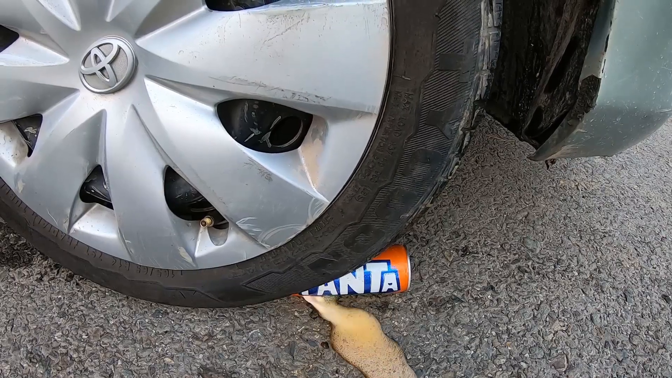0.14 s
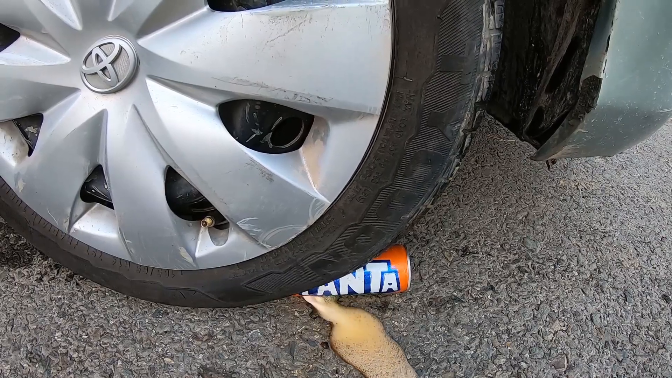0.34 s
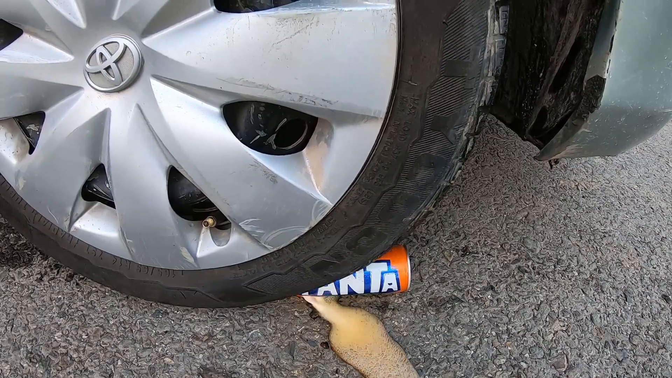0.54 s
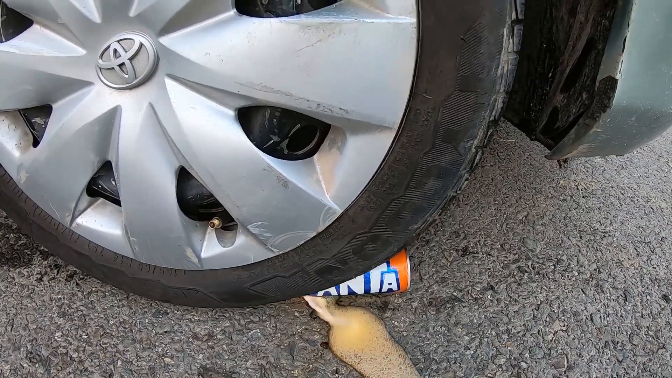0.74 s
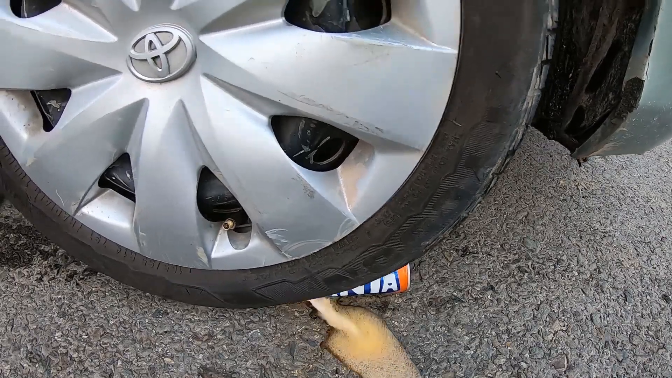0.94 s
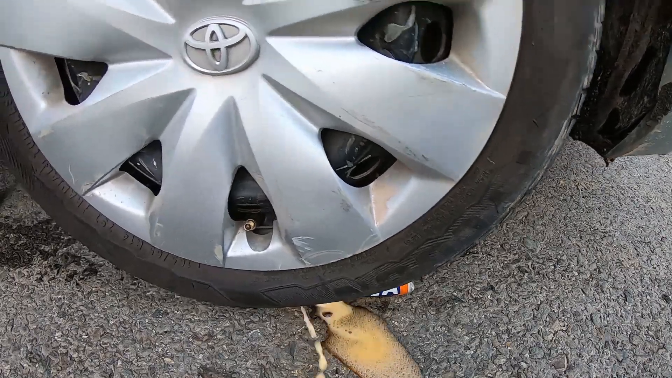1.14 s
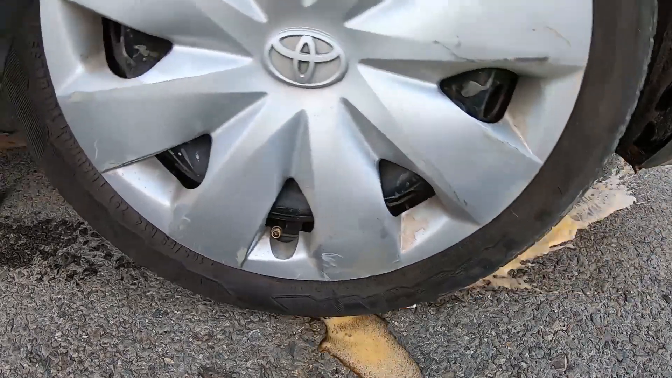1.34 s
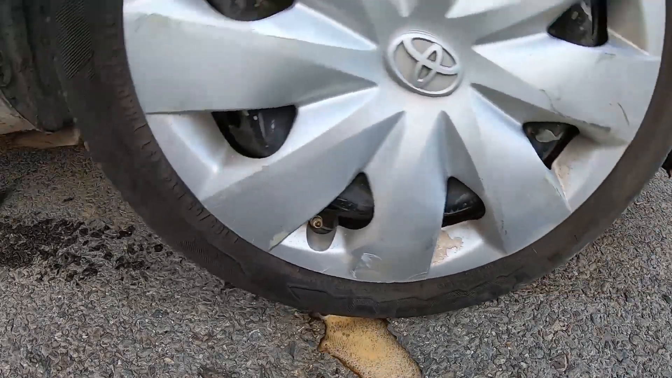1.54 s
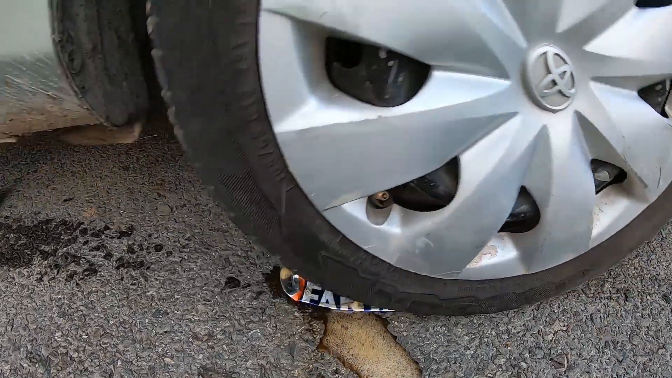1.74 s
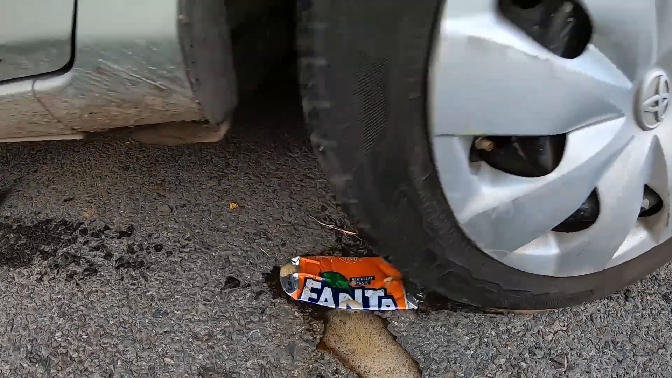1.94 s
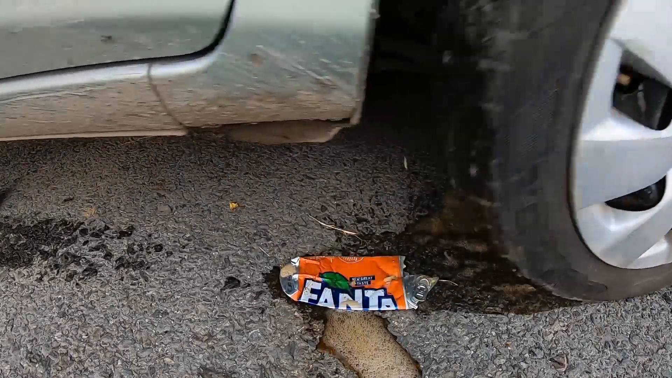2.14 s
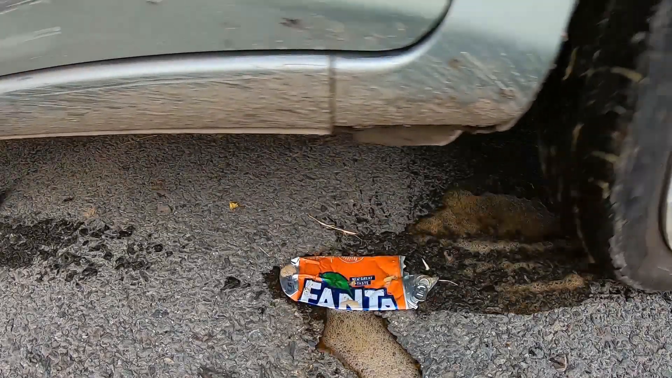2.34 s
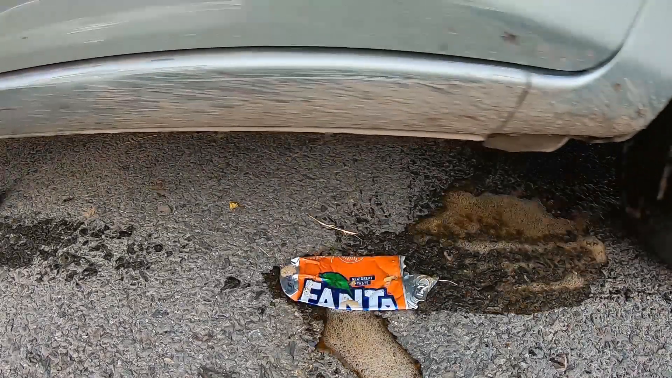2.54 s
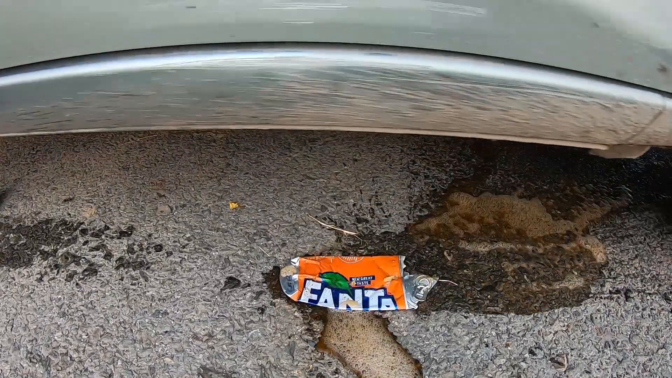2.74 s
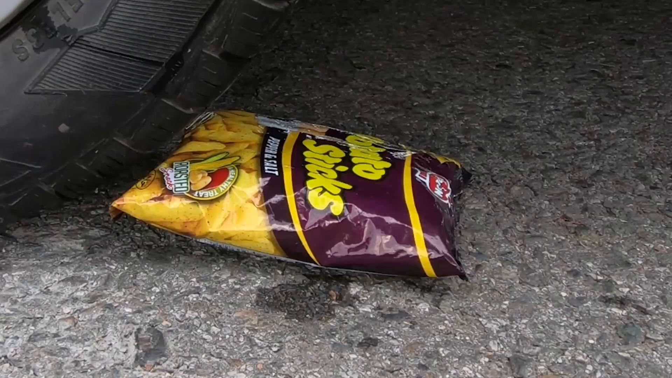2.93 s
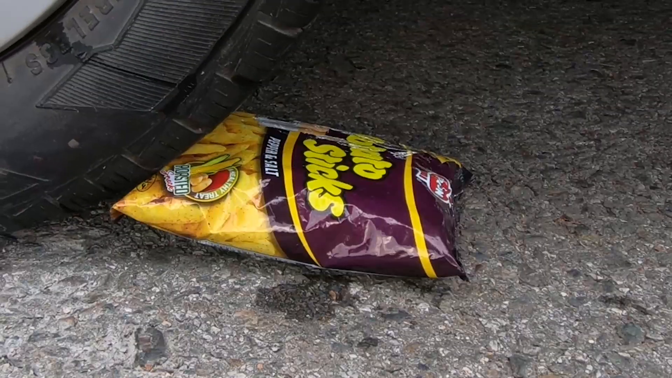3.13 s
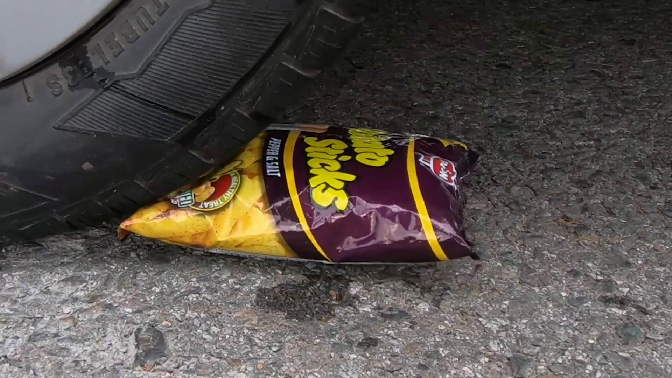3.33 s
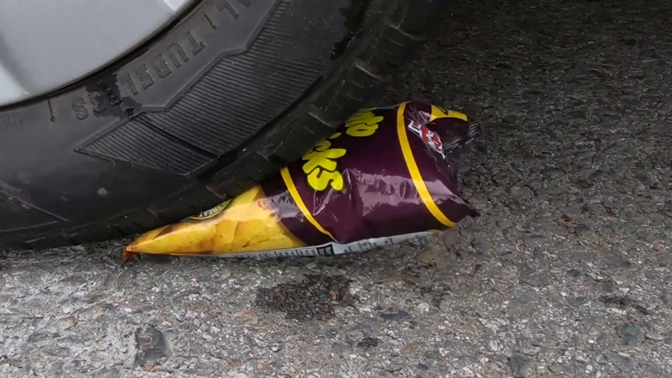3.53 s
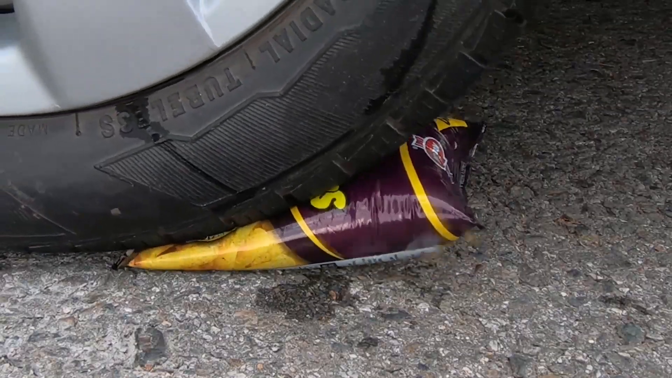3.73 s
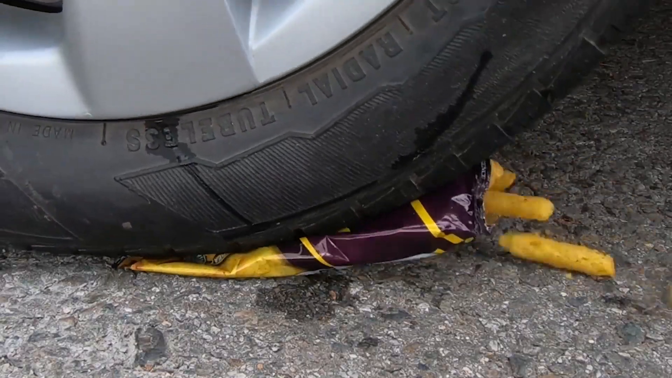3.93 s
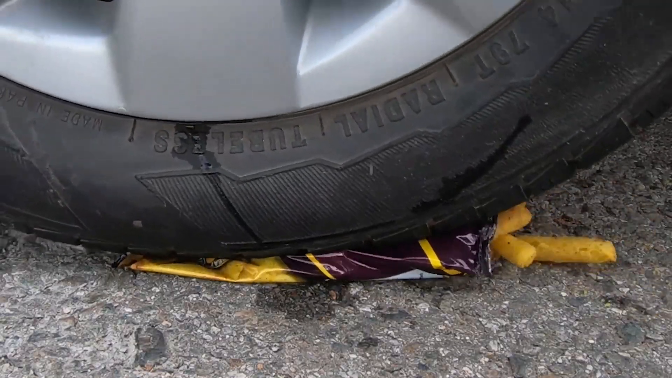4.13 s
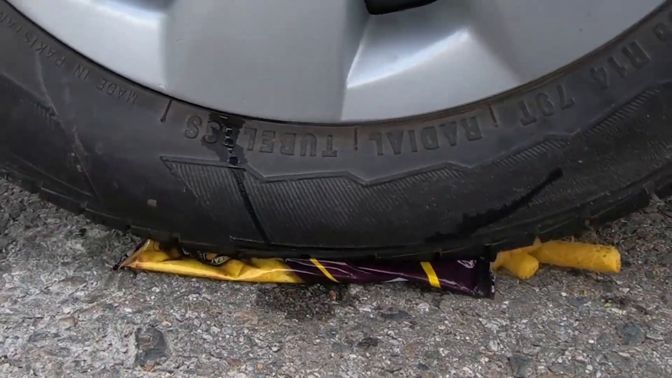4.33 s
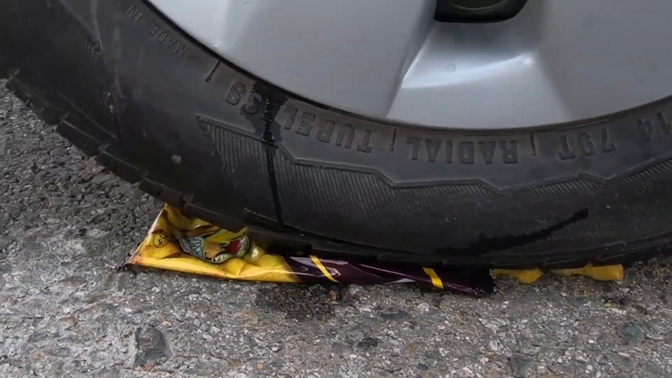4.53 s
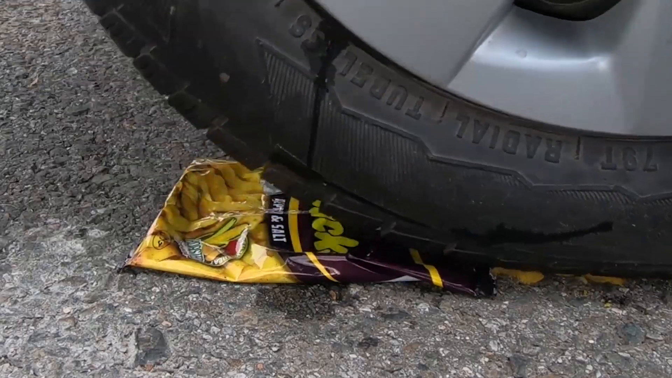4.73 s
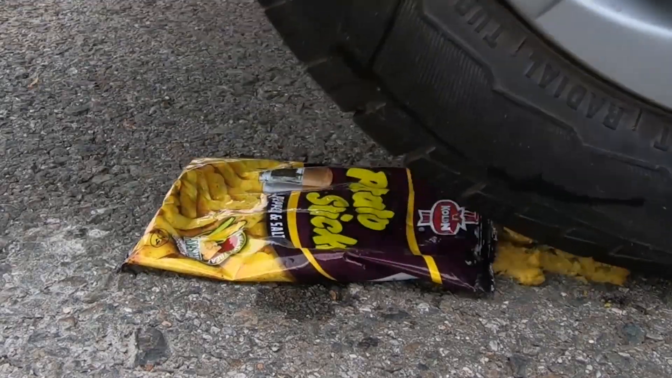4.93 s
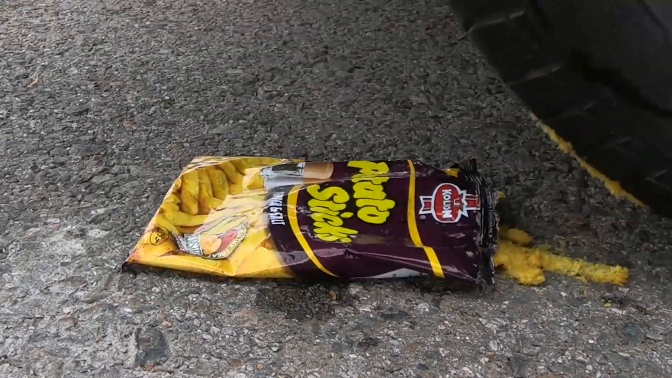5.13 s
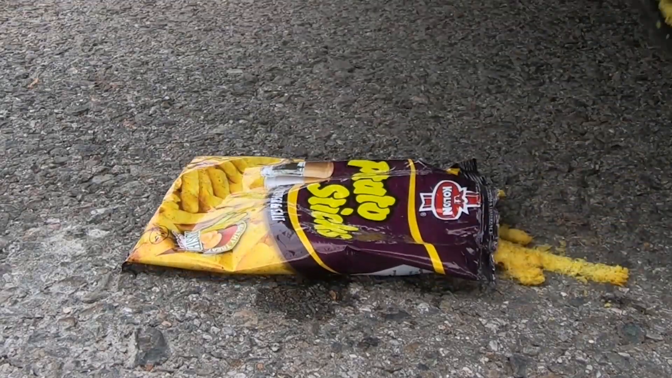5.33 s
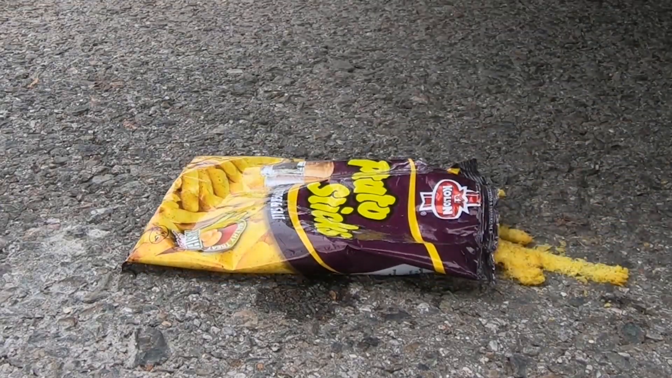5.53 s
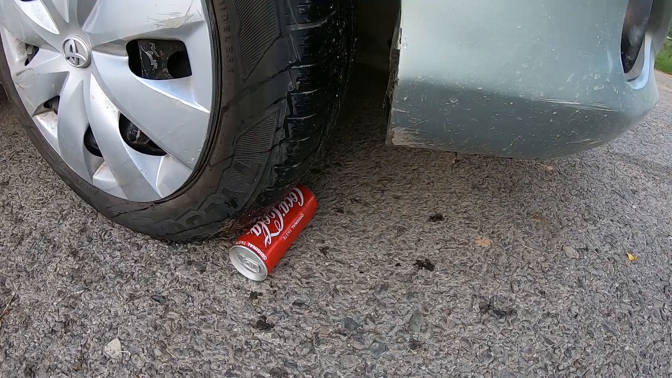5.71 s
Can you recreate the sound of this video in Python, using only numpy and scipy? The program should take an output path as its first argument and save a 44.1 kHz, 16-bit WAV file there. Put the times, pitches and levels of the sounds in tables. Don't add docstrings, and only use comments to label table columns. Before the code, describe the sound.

Outdoors on rough road, a low throbbing engine grows louder as a tyre presses a can: a blunt crack, then a double bang and hiss of foam. Background ducks after each hit while metal ticks. The next take has a rougher idle, crinkling foil, a fluttering seam and loud pop, then faint crisp crunching and peeling. Mics are very near, dry, leaning slightly right.

```python
import sys
import numpy as np
from scipy import signal
from scipy.fft import rfft, irfft
from scipy.io import wavfile
from scipy.ndimage import uniform_filter1d

SR = 44100
rng = np.random.default_rng(int(sys.argv[2]) if len(sys.argv) > 2 else 0)


def voltage_ratio(decibels):
    exponent = np.asarray(decibels, float) / 20
    return 10 ** exponent


def inscribe(sig):
    pcm = np.round(np.clip(np.atleast_2d(sig).T, -1, 1) * 32767)
    wavfile.write(sys.argv[1], SR, pcm.astype(np.int16))


N = 258867
T = np.arange(N) / SR

# start [s], end [s].
TAKES = [
    (0., 2.8467),
    (2.8587, 5.6992),
    (5.7112, 5.87),
]
# frequency [Hz], likeness [0-1].
PORT_LIKENESS = [(60, .99), (330, .975), (600, .88), (950, .85), (2400, .8), (6000, .62), (9000, .35),
                 (13000, .5)]
# frequency [Hz], left over right [dB].
PORT_LEAN = [(60, -1), (380, -2), (2380, -3.5), (5000, -2), (9000, -4.5), (12000, 0.5), (15000, 0.5)]

# time [s], level [dB].
ENGINE_LEVEL = [
    [(0.0, -56), (0.33, -59.5), (0.56, -51)],
    [(0.59, -50), (0.78, -43.5), (0.96, -35), (1.07, -33)],
    [(1.45, -81.5), (2.13, -69), (2.258, -60), (2.53, -55)],
    [(2.58, -81), (2.82, -64.5)],
    [(2.865, -38.5), (3.55, -40.5), (3.82, -46.5)],
    [(3.93, -72), (4.5, -69.5), (5.68, -49)],
    [(5.716, -43), (5.868, -43)],
]
# as it starts [dB], as it ends [dB].
GROWL_OVER_BOOM = [(-3, 0), (3, -12), (2.5, -5), (10, 10), (1.5, 6), (-4, 2.5), (2, 0.5)]
# cycle rate [per s], time of one strong firing [s],
# share of firings against rumble [0-1], unevenness of the cylinders [factor].
ENGINE_CYCLE = [(27.1, 0.26, 0.37, 0.73), (26.86, 0.85, 0.8, 0.5), (26.4, 2.9, 0.02, 0.38),
                (26.5, 2.1, .05, .3), (18.06, 3.085, 0.91, 1.5), (18.1, 5.205, 0.49, 1.9),
                (17.97, 5.77, 0.28, 0.2)]
PULLING_FIRINGS = [0, -5.5, -5]
IDLING_FIRINGS = [-1.5, -2.5, -4, -6.5]
# multiple of the firing rate, level [dB].
PIPE_OVERTONES = [(2, 1), (3, -14), (4, -27)]
# frequency [Hz], level [dB per Hz].
RUMBLE_COLOUR = [(15, -33.5), (25, -3), (97, 0.5), (232, -8), (273, -7.5), (400, -23), (520, -43),
                 (880, -120)]

# time [s], opening [dB].
GATE_OPENING = [(0.0, -3), (0.52, -2), (1.08, 4), (1.13, -15), (1.189, -24), (1.24, -5.5), (1.39, -20),
                (1.886, -18.5), (2.324, -11), (2.84, -8), (2.86, 1), (3.122, -8), (3.5, -8), (3.93, -22.5),
                (4.87, -22), (5.69, -11.5), (5.715, 1), (5.868, -2.5)]
# frequency [Hz], level [dB per Hz].
WASH_NEAR = [(180, -12.5), (300, -3), (493, -7.5), (652, 0.5), (986, -13.5), (1220, -8.5), (1650, -6),
             (2180, -6.5), (4300, -14.5), (5510, -21.5), (6710, -19), (13700, -40.5), (15600, -53.5)]
WASH_FAR = [(180, -21.5), (300, -2), (446, -9.5), (553, -2.5), (1050, -16.5), (1290, -11.5), (2080, -12),
            (4020, -14), (4590, -21.5), (7410, -23.5), (9820, -22.5), (14400, -34.5), (15600, -50.5)]
# body, hiss, top and air [dB].
WASH_OPEN = [(-56, -52, -58.5, -82), (-57, -60, -64, -77.5), (-58.5, -62, -61, -75)]
GATE_LOSS = [.82, 1.03, 1.2, 2.5]

# start [s], end [s], low
# edge [Hz], high edge [Hz], level [dB].
NOISE_SWELLS = [(0.628, 1.09, 3300, 4570, -55.5), (.88, 1.095, 1250, 1830, -47),
                (1.399, 1.514, 1740, 3100, -55.5), (1.522, 1.6, 7600, 11800, -62),
                (1.52, 1.6, 990, 6600, -63.5), (.66, .9, 180, 367, -51), (1.235, 1.257, 600, 2600, -55),
                (1.282, 1.291, 900, 5000, -43), (3.65, 3.678, 1700, 2400, -35),
                (1.593, 1.72, 1100, 5900, -56), (1.716, 1.795, 710, 4500, -59),
                (1.885, 1.988, 890, 3570, -61), (2.847, 3.594, 12210, 14100, -79.5),
                (3.39, 3.6, 850, 1220, -66), (2.19, 2.85, 196, 480, -64), (2.58, 2.72, 200, 270, -57.5),
                (2.73, 2.845, 130, 260, -55), (2.86, 3.2, 9600, 10800, -77.5),
                (5.2, 5.63, 1190, 1520, -77.5), (5.3, 5.4, 1200, 1500, -67.5), (.255, .3, 1100, 6800, -54),
                (.42, .6, 1200, 2000, -55), (.47, .52, 2000, 6200, -56), (.7, .86, 1600, 1730, -55.5),
                (.72, .81, 610, 740, -53.5), (2.2, 2.32, 470, 650, -61.5), (2.64, 2.685, 580, 760, -60),
                (5.02, 5.12, 460, 700, -66), (5.51, 5.7, 563, 750, -66), (1.611, 1.635, 3100, 4900, -49),
                (1.668, 1.692, 1560, 4400, -48.5), (1.745, 1.8, 840, 1250, -58),
                (3.61, 3.705, 900, 1220, -38.5), (4.32, 4.64, 6100, 7350, -62),
                (4.26, 4.46, 4100, 4800, -58), (4.16, 4.42, 870, 1220, -61.5), (.14, .195, 4700, 6200, -62),
                (.035, 0.13, 1900, 3000, -62)]

# time of the top [s], peak [dB],
# pitch [Hz], rise [s], fall [s].
THUMPS_AND_FOLDS = [(1.0888, -13, 380, .001, .002), (1.0915, -14, 1300, .0008, .002),
                    (1.1687, -15, 290, .003, .005), (1.168, -41, 560, .003, .01), (1.22, -40, 290, .012, .015),
                    (1.184, -27, 295, .004, .005), (1.248, -32, 280, .005, .006), (1.12, -35, 90, .02, .03),
                    (1.21, -43, 110, .03, .03), (.607, -31, 87, .022, .022), (.715, -37, 162, .05, .04),
                    (.7, -50, 305, .05, .05), (.525, -45, 163, .02, .02), (3.6655, -15, 620, .0012, .0015),
                    (3.853, -26, 560, .006, .007), (3.852, -24, 240, .003, .008), (3.845, -21, 420, .008, .004),
                    (3.846, -26, 55, .012, .013), (1.38, -62, 270, .02, .05), (1.36, -54, 45, .02, .04),
                    (4.03, -56, 140, .02, .03), (4.25, -60, 140, .04, .04),
                    (1.2599, -12, 295, 0.0024, 0.003), (1.259, -13, 520, .0018, 0.0026),
              (1.2588, -24, 1000, .001, .003), (1.2586, -23, 2200, 0.00092, 0.0014),
              (1.258, -25, 4250, .0006, .001), (1.2905, -9, 4300, 0.00023, 0.00069),
              (1.2933, -8.5, 340, .002, 0.001), (1.291, -9, 1000, .0005, .0013),
              (1.2915, -9.5, 1850, .0006, .0012), (1.2906, -22, 8300, 0.00029, 0.00047),
              (1.3025, -19, 140, .004, .008), (1.091, -13, 1100, .0008, .0012),
              (1.098, -20, 300, 0.0016, .005), (3.6672, -18, 1100, .0008, .001),
              (3.6987, -16, 2900, .0004, 0.0015)]
# time of the top [s], peak [dB].
SEAM_POPS = [(3.8165, -28), (3.827, -15), (3.8325, -21), (3.8377, -8), (3.8435, -15)]
# time of the top [s], peak [dB], pitch [Hz], rise [s], fall [s].
SEAM_RIP = [(3.8477, 1, 780, .00085, .00085), (3.8478, -10.5, 1800, .0004, .0005)]

# time [s], peak [dB], pitch [Hz], left over right [dB].
FOIL_TICKS = [(3.5114, -47, 2340, -8), (3.5633, -34.5, 1880, -4), (3.583, -35, 1670, -2.0),
              (3.6131, -22.5, 4430, -2), (3.7655, -22, 1100, 2), (4.8537, -67, 1570, -7.5)]
# time [s], peak [dB], pitch [Hz], left over right [dB].
THIN_TICKS = [(1.5384, -39, 2700, -8), (1.539, -37.5, 9100, -11), (3.8342, -14.5, 6610, -6),
              (3.8338, -25, 6500, -6), (3.8476, -19, 3900, -2), (3.698, -26.5, 9600, -6.5),
              (1.4668, -52, 6500, -4)]

# time [s], peak [dB], pitch [Hz].
BAG_SNAPS = [(3.6202, -36, 2700.0), (3.628, -27.0, 1600.0), (3.6318, -17, 3900.0), (3.6365, -21, 1600.0),
             (3.6394, -27, 1600.0), (3.648, -16.0, 2400.0), (3.6706, -10.5, 2200.0),
             (3.6784, -20.0, 2700.0), (3.6812, -17.5, 4200.0), (3.6835, -20.0, 3100.0),
             (3.6869, -21.0, 2200.0), (3.6955, -23.0, 3100.0), (3.6982, -10.0, 2900.0),
             (3.7067, -25, 3400.0), (3.711, -21.5, 2900.0), (3.7148, -20.0, 3300.0), (3.719, -22.5, 2600.0),
             (3.7226, -21.5, 5300.0), (3.7281, -22.0, 4800.0), (3.7346, -20.5, 3300.0),
             (3.7417, -24.0, 3200.0), (3.7441, -19.0, 4200.0), (3.7463, -19, 3200.0), (3.7539, -19, 3300.0),
             (3.7594, -23, 3200.0), (3.7625, -17, 2800.0), (3.7665, -13.0, 3400.0), (3.7708, -21, 2000.0),
             (3.7734, -23.0, 2900.0), (3.784, -21.0, 3500.0), (3.7865, -19, 3300.0), (3.791, -12, 4700.0)]
# time [s], peak [dB].
SEAM_FLAPS = [(3.7955, -21), (3.7978, -21), (3.8005, -17), (3.8034, -18), (3.8067, -18), (3.8107, -15),
              (3.8148, -19), (3.8183, -19), (3.8217, -18), (3.8251, -16), (3.8283, -21), (3.8315, -18)]
# time [s], peak [dB], pitch [Hz].
CRISP_SNAPS = [(4.115, -44.0, 3600.0), (4.1399, -40.0, 4100.0), (4.1698, -36, 3700.0),
               (4.184, -38.0, 3900.0), (4.1933, -38.0, 4100.0), (4.2127, -36.0, 3600.0),
               (4.226, -39.0, 2400.0), (4.257, -32.5, 1600.0), (4.2609, -37.5, 3400.0),
               (4.2717, -37.0, 3400.0), (4.287, -35.0, 3400.0), (4.3005, -32, 5200.0),
               (4.3091, -30, 6400.0), (4.3322, -33.0, 4500.0), (4.3825, -36, 4800.0), (4.41, -38.0, 2000.0),
               (4.4214, -38.0, 2800.0), (4.4349, -41.0, 3000.0), (4.4902, -43.0, 6600.0),
               (4.5527, -39.0, 6100.0), (4.5802, -41, 6300.0), (4.6025, -41, 5570)]
# time [s], peak [dB], pitch [Hz].
PEEL_SNAPS = [(4.9144, -47, 5900), (4.9428, -44, 5800), (4.9741, -46.5, 8300), (4.9821, -46, 3400),
              (4.999, -43, 4300), (5.002, -38, 6200), (5.0094, -40, 6100), (5.0303, -45, 6100),
              (5.0504, -53, 5400), (5.0591, -58, 3200)]
# time [s], peak [dB], pitch [Hz].
CAN_PINGS = [(1.4239, -21, 2400), (1.4277, -37, 2600), (1.4312, -36, 2680), (1.4385, -43.5, 2600),
             (1.4465, -32, 2350), (1.4677, -29.5, 2300), (1.6125, -23, 3050), (1.613, -20, 4330),
             (1.6152, -37, 3770), (1.6188, -41, 4000), (1.6845, -37, 2300), (1.7535, -42, 1050)]
# time [s], peak [dB], pitch [Hz].
RIM_CRACKS = [(1.611, -13.5, 4200), (1.6417, -20.5, 2630), (1.664, -24, 2700), (1.7233, -39, 1800),
              (1.742, -43, 4300), (1.742, -45, 1800), (1.7528, -45, 4200), (1.753, -43, 2190),
              (1.9035, -50, 2500), (1.9182, -39.5, 2200), (1.921, -41.5, 1515)]
# time [s], peak [dB], pitch [Hz].
GRIT_POPS = [(0.037, -42, 1580), (0.1485, -41, 2470), (0.258, -38, 2490), (0.4255, -38, 1400),
             (0.488, -38, 1420), (0.5426, -38, 2430), (0.6398, -40, 4320), (0.7182, -42, 1660),
             (0.7626, -39, 1680), (0.8817, -38, 3250), (0.9402, -34, 1490), (0.9515, -32.5, 1770),
             (0.9796, -32, 1600), (2.6514, -51, 1920)]
# cycles of swell, click [dB], scatter [dB], scatter decay [s], top [Hz].
SNAP_KIND = [
    (.45, -15.5, -13.5, .0015, 8990),
    (.6, -20, -15, .0015, 8000),
    (.9, -20, -15, .001, 10000),
    (1.1, -19, -26, 0.0037, 6000),
    (.5, -14, -12, .002, 5400),
    (.7, -12.5, -10.5, .004, 7000),
]
SNAP_TRIM = [.5, -1.7, 0, 0.078, 1, -2]

# time [s], force [dB].
CRUSH_FORCE = [
    [(1.089, -42), (1.094, -43), (1.11, -59), (1.16, -86)],
    [(1.256, -29), (1.266, -42), (1.289, -48)],
    [(1.2893, -16), (1.295, -31), (1.31, -40), (1.345, -54), (1.385, -93.5)],
    [(3.5, -57.5), (3.55, -72), (3.565, -50.5), (3.612, -56.5)],
    [(3.6, -54), (3.625, -39), (3.65, -33), (3.67, -32.5), (3.7, -39.5)],
    [(3.685, -36), (3.76, -35.5), (3.8, -37), (3.83, -37.5), (3.842, -41), (3.853, -32)],
    [(3.853, -43), (3.865, -54), (3.91, -87)],
    [(4.075, -84), (4.115, -55), (4.2, -51.5), (4.3, -47), (4.4, -51), (4.5, -60.5), (4.6, -70.5),
     (4.68, -87.5)],
    [(4.08, -96), (4.12, -71), (4.3, -66), (4.45, -68), (4.56, -67.5), (4.65, -75.5), (4.73, -100)],
    [(4.885, -98), (4.905, -70.5), (4.97, -66), (5.01, -61), (5.055, -69.5), (5.09, -98)],
]
# low at start, low at end, top at start, top at end [dB].
CRUSH_TINT = [(22, 17, -22, -20), (11, 9, -22, -10.5), (4, 3, -7, 1), (4, 1, -10, -30),
              (-1.5, 5.5, -13, -7.5), (-3.5, -7.5, -9, -3), (13, 11, -4, -12), (-2, -13, -25, -25),
              (-25, -25, 12, 11), (-1, -9.5, 8.5, 6)]
# snap rate [per s], size spread [dB], share of snaps against rush [0-1], lowest frequency [Hz].
CRUSH_GRAIN = [(3100, 0, 0.5, 278), (1940, 3.5, 0.2, 270), (6000, 2, 0.3, 170), (1510, 4, 0.14, 480),
               (1800, 3.5, 0.6, 330), (1800, 3.5, 0.6, 790), (3000, -0.5, 0.1, 330), (2000, 4, 0.55, 1250),
               (3000, 2, .3, 1500), (4045, 5, 0.36, 1400)]
# frequency [Hz], level [dB per Hz].
CRUSH_COLOUR = [(300, -6), (600, -4), (1170, -1), (1500, -7.5), (3000, -3), (4600, -7), (5500, -15.5),
                (6800, -11), (7900, -21.5), (9400, -18.5), (10300, -28.5), (12500, -37), (15600, -63.5)]

# time [s], peak [dB], length of the fold [s], sharpness [Hz].
CAN_BLOWS = [
    (1.0907, -4.5, 0.0017, 3537),
    (1.2555, -14, 0.0003, 3000),
    (1.2901, -13, 0.001, 6000),
]
# frequency [Hz], level [dB], decay by 60 dB [s].
DENT_MODES = [(290, -4, 0.092), (520, 0, 0.03), (1105, 2, 0.027), (1440, -6, 0.033), (2340, -12, 0.018)]
BUCKLE_MODES = [(295, 0, 0.09), (980, -16, .03)]
BURST_MODES = [(74, 0, 0.11), (146, 1, .07), (646, -2, 0.033), (1420, -8, 0.027)]


def evened(x):
    return x / np.sqrt(np.mean(x ** 2) + 1e-20)


def read(points, hz):
    f, value = np.transpose(points)
    return np.interp(np.log(hz + 1), np.log(f + 1), value)


def add(mix, s, sound):
    part = mix[..., round(s * SR):][..., :sound.shape[-1]]
    part += sound[..., :part.shape[-1]]


def left_right(db):
    return voltage_ratio(np.array([[.5], [-.5]]) * db)


def ports(pair):
    a, b = rfft(pair)
    hz = np.fft.rfftfreq(pair.shape[1], 1 / SR)
    same = np.clip(read(PORT_LIKENESS, hz), 0, 1)
    lean = voltage_ratio(read(PORT_LEAN, hz) / 2)
    right = same * a + np.sqrt(1 - same ** 2) * b
    return irfft([a * lean, right / lean], pair.shape[1])


def band(x, colour, lo_hz, hi_hz):
    hz = np.fft.rfftfreq(x.shape[1], 1 / SR) + 10
    sides = 1 / np.sqrt((1 + (lo_hz / hz) ** 60) * (1 + (hz / hi_hz) ** 60))
    return evened(irfft(rfft(x) * sides * voltage_ratio(read(colour, hz)), x.shape[1]))


def patchy(length, patchy_db, size=256, tall=5, wide=14):
    frames = dict(fs=SR, nperseg=size, noverlap=size * 3 // 4)
    z = signal.stft(rng.standard_normal((2, length + size)), **frames)[2]
    patches = uniform_filter1d(rng.standard_normal(z.shape[1:]), tall, 0)
    patches = uniform_filter1d(patches, wide, 1)
    return signal.istft(z * voltage_ratio(patchy_db * evened(patches)), **frames)[1][:, :length]


def engine():
    out = np.zeros((2, N))
    noise = ports(patchy(N, 2.8, size=2048, tall=3, wide=8))
    rumble = band(noise, RUMBLE_COLOUR, 25, 115), band(noise, RUMBLE_COLOUR, 115, 330)
    for rows, growl_db, (rate_hz, firing_s, share, uneven) in zip(ENGINE_LEVEL, GROWL_OVER_BOOM, ENGINE_CYCLE):
        s, loud_db = np.transpose(rows)
        on = (T > s[0] - .03) & (T <= s[-1] + .03)
        t, share = T[on], np.clip(share, 0, 1)
        pattern = np.array(PULLING_FIRINGS if rate_hz > 22 else IDLING_FIRINGS)
        firings = len(pattern) * rate_hz * (t - firing_s)
        each = np.arange(np.floor(firings[0]), firings[-1] + 1)
        strength_db = uneven * pattern[each.astype(int) % len(pattern)] + 2.0 * rng.standard_normal(len(each))
        strength = voltage_ratio(np.interp(firings, each, strength_db))
        jitter = np.interp(firings, each, 0.044 * rng.standard_normal(len(each)))
        turns = 2 * np.pi * (firings + jitter)
        boom = -np.cos(turns - .3)
        growl = -sum(voltage_ratio(db) * np.cos(k * turns) for k, db in PIPE_OVERTONES)
        edge = np.clip(np.minimum(t - t[0], t[-1] - t) / .025, 0, 1)
        for hum, wash, db in zip((boom, growl), rumble, (0, np.linspace(*growl_db, len(t)))):
            thuds = np.sqrt(share) * evened(hum * strength)
            fill = np.sqrt(1 - share) * evened(strength) * wash[:, on]
            out[:, on] += edge * voltage_ratio(np.interp(t, s, loud_db) + db) * (thuds + fill)
    return out


def roll():
    chug_from_s, near_left_db = 4.62, 2.5
    gate_db = np.interp(T, *np.transpose(GATE_OPENING))
    take = (T > TAKES[0][1]).astype(int) + (T > TAKES[1][1])
    lumpy = ports(patchy(N, 3.7, size=1024, tall=3, wide=10))
    fine = ports(patchy(N, 3.4, tall=5, wide=24))
    rate_hz, throb_s = ENGINE_CYCLE[5][:2]
    chug = np.cos(2 * np.pi * rate_hz * (T - throb_s) - .5) * (T > chug_from_s)
    edges_hz = 320, 1150, 5000, 10800, 15500
    chug_depths_db = 3.2, 2.3, 1.4, 2.8
    out = np.zeros((2, N))
    for open_db, lost, lo_hz, hi_hz, chug_db in zip(
            np.transpose(WASH_OPEN), GATE_LOSS, edges_hz[:-1], edges_hz[1:], chug_depths_db):
        noise = lumpy if hi_hz < 2000 else fine
        near = left_right(near_left_db) * band(noise, WASH_NEAR, lo_hz, hi_hz)
        far = band(noise, WASH_FAR, lo_hz, hi_hz)
        level_db = open_db[take] + lost * gate_db + chug_db * chug
        out += voltage_ratio(level_db) * np.where(take == 0, near, far)
    return out


def fizz():
    fade_db = 4.5
    out = np.zeros((2, N))
    for t0, t1, lo_hz, hi_hz, db in NOISE_SWELLS:
        length = round((t1 - t0) * SR)
        window = signal.windows.tukey(length, min(.55, 0.06 / (t1 - t0)))
        swell = window * voltage_ratio(db - fade_db * np.linspace(-1, 1, length))
        add(out, t0, swell * band(ports(patchy(length, 3.8)), [(100, 0), (20000, -12)], lo_hz, hi_hz))
    return out


def exhaust_knocks():
    last_s, last_db, grows_db, hz, count = 5.655, -43, 2.1, 275, 14
    rate_hz = ENGINE_CYCLE[5][0]
    return [(last_s - k / rate_hz, last_db - k * grows_db + 2 * rng.standard_normal(), hz, .007, .01)
            for k in range(count)]


def thumps():
    seam_hz, seam_s = 765, .0013
    out, t = np.zeros(N), np.arange(-SR // 20, SR // 10) / SR
    seam = [(s, db, seam_hz, seam_s, seam_s) for s, db in SEAM_POPS]
    for s, db, hz, rise, fall in THUMPS_AND_FOLDS + SEAM_RIP + exhaust_knocks() + seam:
        shape = np.exp(-.5 * (t / np.where(t < 0, rise, fall)) ** 2)
        add(out, s + t[0], -voltage_ratio(db) * shape * np.cos(2 * np.pi * hz * t))
    return out


def ticks():
    ring_cycles, below_ring = 3.4, .55
    out, t = np.zeros((2, N)), np.arange(1500) / SR
    for rows, top_hz in (FOIL_TICKS[:3], 5200), (FOIL_TICKS[3:], 6000), (THIN_TICKS, 11500):
        for (s, db, hz, pan_db), noise in zip(rows, rng.standard_normal((len(rows), 1500))):
            gate = signal.cheby1(6, 1, [below_ring * hz, top_hz], "bandpass", fs=SR, output="sos")
            ring = np.exp(-t * hz / ring_cycles) * np.sin(2 * np.pi * hz * t)
            click = noise * (0.35 * np.exp(-t / 0.0004) + 0.1 * np.exp(-t / 0.0035))
            tick = signal.sosfilt(gate, ring + click)
            add(out, s, voltage_ratio(db) * left_right(pan_db) * tick / abs(tick).max())
    return out


def cracks():
    flap_hz = 3700
    out, t = np.zeros((2, N)), np.arange(-100, 500) / SR
    bag = BAG_SNAPS + [(s, db, flap_hz) for s, db in SEAM_FLAPS]
    kinds = bag, CRISP_SNAPS, PEEL_SNAPS, CAN_PINGS, RIM_CRACKS, GRIT_POPS
    for rows, kind_db, (cycles, click_db, scatter_db, scatter_s, top_hz) in zip(kinds, SNAP_TRIM, SNAP_KIND):
        click = voltage_ratio(click_db + 10) * np.exp(-abs(t) / .00012)
        scatter = voltage_ratio(scatter_db) * np.exp(-abs(t) / scatter_s)
        for (s, db, hz), noise in zip(rows, rng.standard_normal((len(rows), 2, len(t)))):
            gate = signal.butter(4, [.45 * hz, top_hz], "bandpass", fs=SR, output="sos")
            phase = 3 * noise[0, 0]
            swell = np.exp(-.5 * (t * hz / cycles) ** 2) * np.cos(2 * np.pi * hz * t + phase)
            rough = noise * (t >= 0) * (click + scatter)
            add(out, s + t[0], voltage_ratio(db + kind_db) * left_right(-2) * signal.sosfiltfilt(gate, swell + rough))
    return out


def snaps(length, per_s, spread_db):
    size = voltage_ratio(spread_db * np.minimum(rng.exponential(1, length), 4.5))
    size = size * (rng.random(length) < per_s / SR)
    burst = signal.lfilter([1], [1, -np.exp(-1 / (.0004 * SR))], size)
    return evened(burst * rng.standard_normal((2, length)))


def crush():
    out = np.zeros((2, N))
    for rows, tint_db, (per_s, spread_db, share, lowest_hz) in zip(CRUSH_FORCE, CRUSH_TINT, CRUSH_GRAIN):
        s, force_db = np.transpose(rows)
        t, share = np.arange(s[0], s[-1], 1 / SR), np.clip(share, 0, 1)
        rush = evened(patchy(len(t), 3.0, tall=4, wide=40))
        split_hz = np.clip(3 * lowest_hz, 1800, 2600)
        wide = snaps(len(t), per_s, spread_db)
        low_db = np.linspace(*tint_db[:2], len(t))
        top_db = np.linspace(*tint_db[2:], len(t))
        force = signal.windows.tukey(len(t), .05) * voltage_ratio(np.interp(t, s, force_db))
        for db, lo_hz, hi_hz in (low_db, lowest_hz, split_hz), (0, split_hz, 5000), (top_db, 5000, 15500):
            crackle = evened(.4 * wide + snaps(len(t), per_s, spread_db))
            grain = ports(np.sqrt(share) * crackle + np.sqrt(1 - share) * rush)
            add(out, s[0], force * voltage_ratio(db) * band(grain, CRUSH_COLOUR, lo_hz, hi_hz))
    return out


def can():
    out, t = np.zeros(N), np.arange(SR // 4) / SR
    for (s, db, fold, sharp_hz), modes in zip(CAN_BLOWS, (DENT_MODES, BUCKLE_MODES, BURST_MODES)):
        jolts = rng.standard_normal(600) * (rng.random(600) < .05) * .6 * np.exp(-t[:600] / fold)
        jolts[0] = 2.5
        shell = -sum(voltage_ratio(m_db - 60 * t / t60) * np.sin(2 * np.pi * hz * t) for hz, m_db, t60 in modes)
        ring = signal.lfilter(*signal.butter(2, sharp_hz, fs=SR), signal.oaconvolve(shell, jolts))
        add(out, s, voltage_ratio(db) * ring / abs(ring).max())
    return out


def both_ports(knocks):
    fade = np.exp(-np.arange(120) / 30)
    smear = rng.standard_normal(120) * fade
    smear = smear - fade * smear.sum() / fade.sum()
    scattered = signal.oaconvolve(knocks, smear / np.linalg.norm(smear) * 1.6)[:N]
    return ports(np.array([knocks, scattered]))


def scene():
    knocks = both_ports(thumps() + can())
    return engine() + roll() + fizz() + ticks() + cracks() + crush() + knocks


def roll_off(x):
    return signal.sosfilt(signal.butter(12, 15750, fs=SR, output="sos"), x)


def record(dry):
    heard = signal.sosfilt(signal.butter(2, 34, "highpass", fs=SR, output="sos"), dry)
    clipped = np.clip(heard, -.92, .92)
    running = sum((T >= start) & (T < end) for start, end in TAKES)
    return roll_off(clipped * uniform_filter1d(running * 1., size=60))


dry = scene()
out = record(dry)
inscribe(out)
```